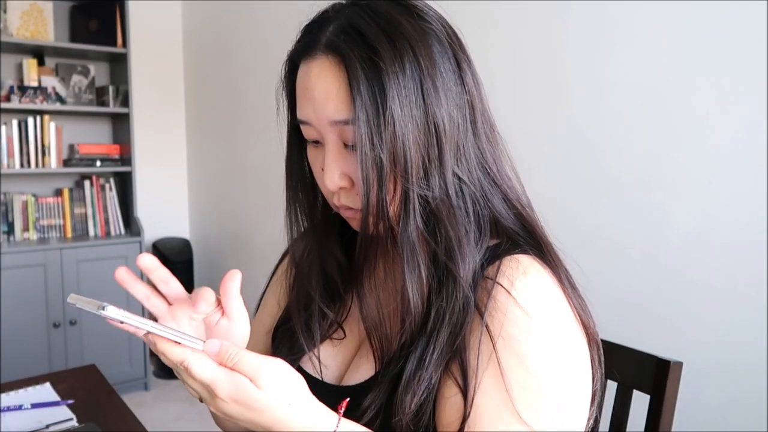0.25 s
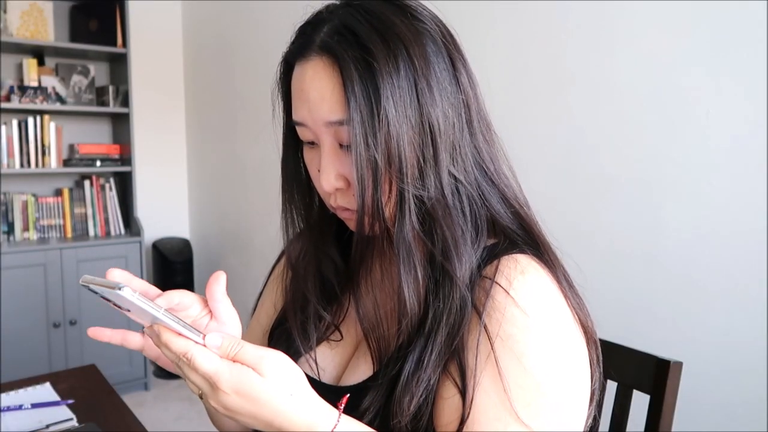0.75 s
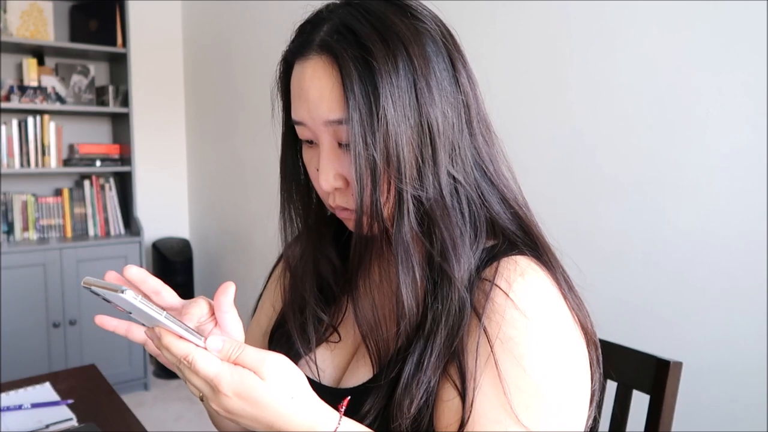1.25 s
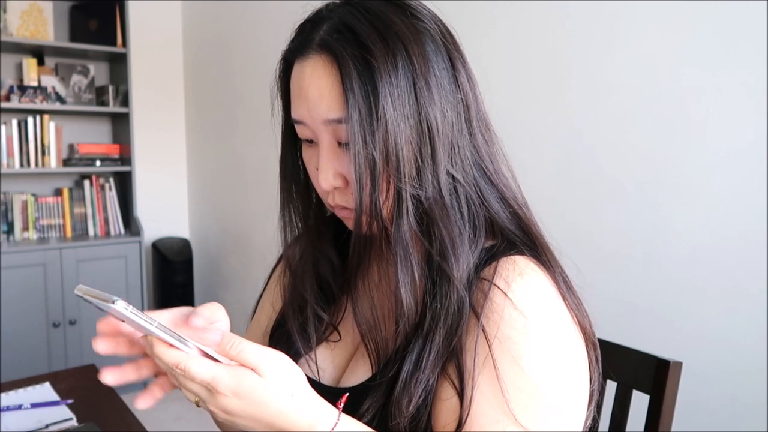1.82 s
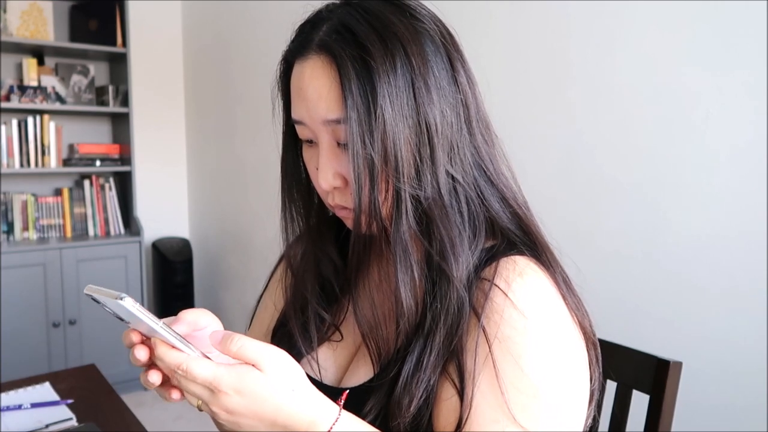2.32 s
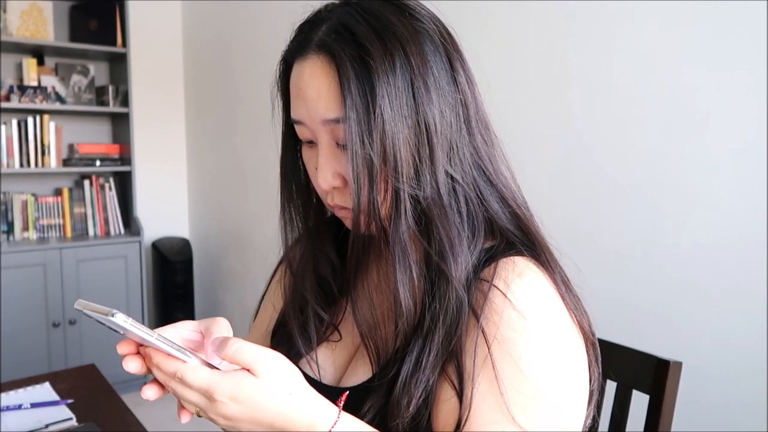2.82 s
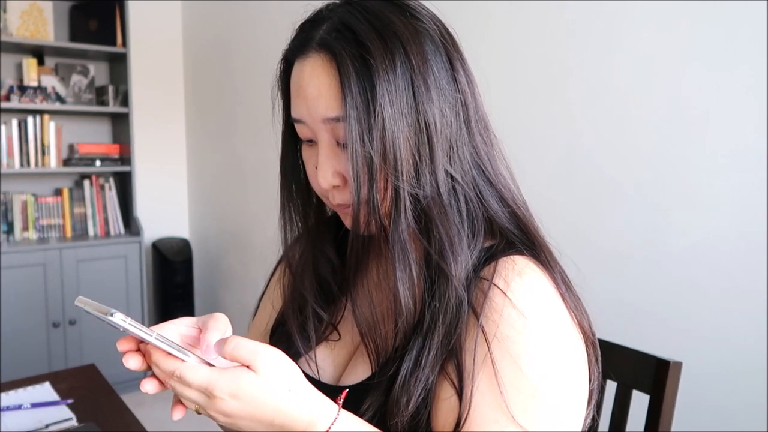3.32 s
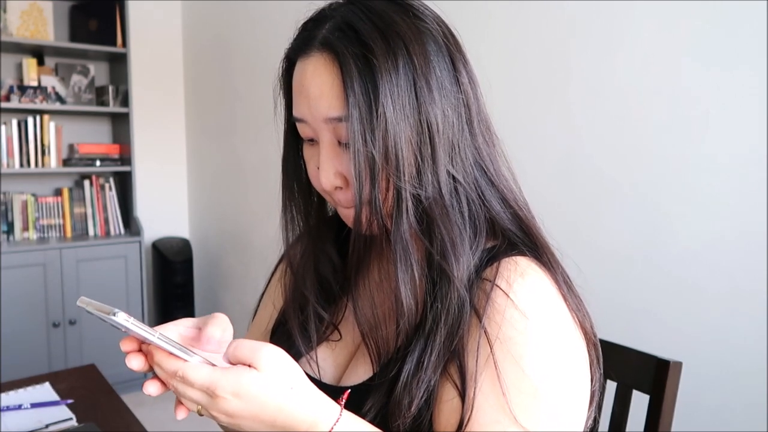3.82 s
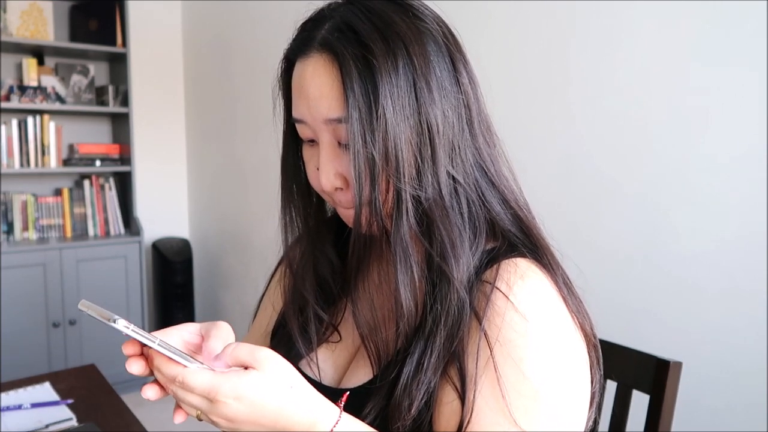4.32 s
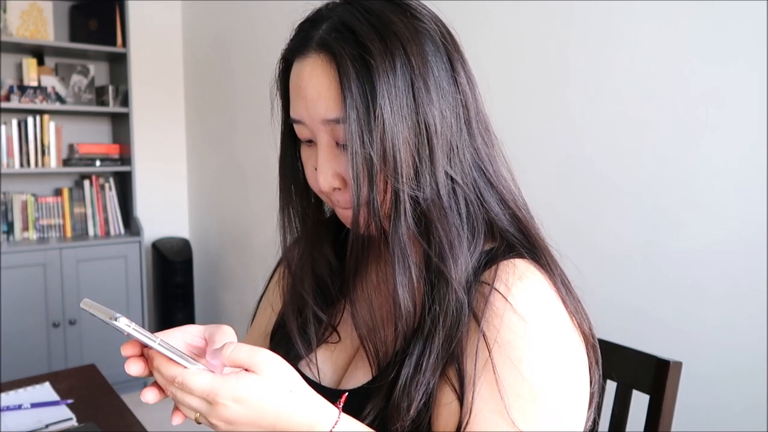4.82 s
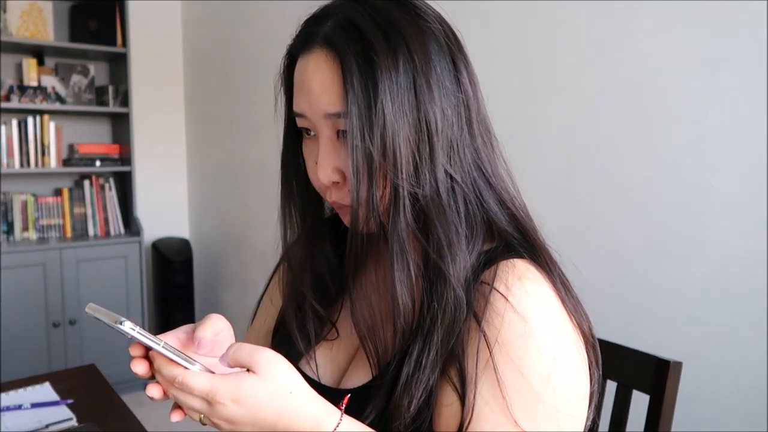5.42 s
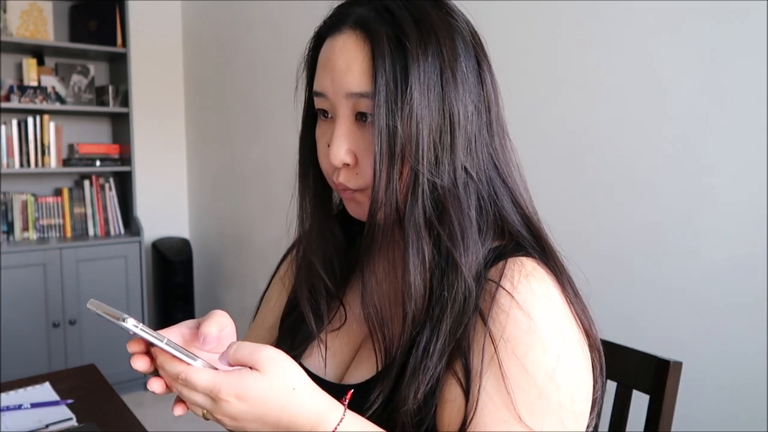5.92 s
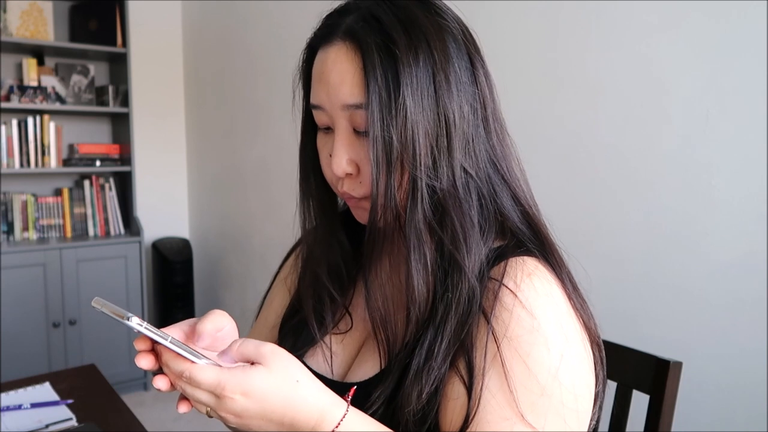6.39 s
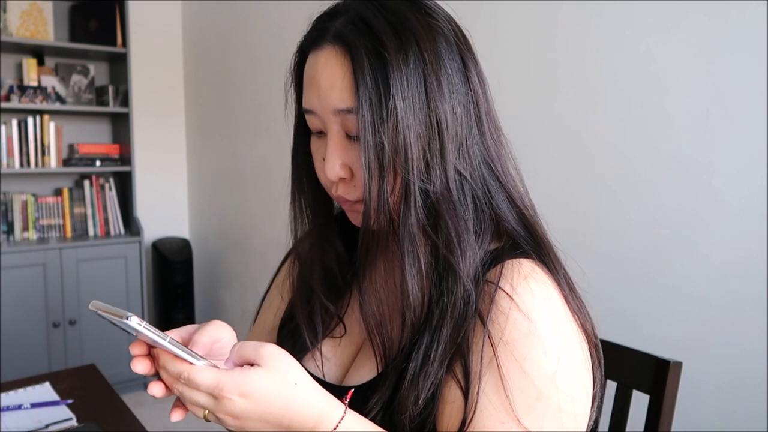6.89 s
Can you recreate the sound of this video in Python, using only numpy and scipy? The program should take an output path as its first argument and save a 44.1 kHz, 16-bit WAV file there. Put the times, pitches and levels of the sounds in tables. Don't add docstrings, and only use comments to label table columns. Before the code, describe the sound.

A quiet indoor room tone: dull mains hum, gentle hiss of moving air, thin wavering motor whine and minute lens-motor clicks.

```python
import sys
import numpy as np
from scipy import signal
from scipy.fft import rfft, irfft, next_fast_len
from scipy.io import wavfile
from scipy.ndimage import uniform_filter1d

SR = 44100
rng = np.random.default_rng(int(sys.argv[2]) if len(sys.argv) > 2 else 0)


def wav_record(signal):
    frames = np.transpose(np.atleast_2d(signal))
    bounded = np.clip(frames, -1, 1)
    quanta = np.round(bounded * 32767).astype(np.int16)
    wavfile.write(sys.argv[1], SR, quanta)


def nominal_scale(level):
    x = np.asarray(level, float) / 20
    return 10 ** x


N = 315315
T = np.arange(N) / SR
SIDES = np.array([[1], [-1]])
MAINS_HZ, SHAFT_HZ, FRAME_HZ, DRIVE_HZ = 60.004, 9.37, 29.97, 13006.99

# multiple of the mains, level in dB, left minus right in dB.
MAINS = [(2, -45.1, 0), (6, -69.5, 0.3), (8, -57.6, -1.8), (10, -68.2, 0)]
# frequency in Hz, level in dB, waver in Hz, right port lag in rad.
MOTOR_TONES = [(59.9, -64, .1, 0), (665.2, -72, .6, -.3), (3672.8, -89, .2, -.3), (4790, -92.5, 4, 0),
               (7416, -95, .5, 3), (10550, -100, .5, 3), (11778.2, -100, .1, -.8)]
# time in seconds, slot tone in Hz, its level in dB,
# level of the next shaft multiple in dB, beat lead in turns.
FAN_WHINE = [(0.0, 2426.1, -68, -70, .48), (.35, 2426.1, -67, -69, .44), (.68, 2426.6, -76, -69, .32),
             (1.05, 2428.3, -70, -68.5, .33), (1.35, 2427.7, -66.5, -67, .2),
             (1.75, 2427.5, -63.5, -69, .26), (2.1, 2426.7, -64, -67.5, .36), (2.5, 2425.8, -65, -69, .43),
             (2.9, 2425.3, -69, -71, .38), (3.2, 2424.5, -71, -71.5, .25), (3.5, 2424.4, -69.5, -75.5, .12),
             (3.9, 2424.2, -67, -73.5, .22), (4.4, 2423.0, -66.5, -75.5, .16),
             (4.9, 2425.2, -70.5, -74, .19), (5.4, 2424.9, -68.5, -70, .18), (5.9, 2427.2, -75, -69.5, .06),
             (6.4, 2427.4, -68, -71, -.05), (7.15, 2429.2, -66.5, -68.5, .06)]
GAITS = {"creep": (3, [(0, 0), (.014, -3), (.034, -3), (.058, -2.5)]), "hunt": (2, [(0, 0), (.026, -1.5)]),
         "turn": (2, [(0, 0), (.017, -1.5)]), "sweep": (3, [(0, 0), (.017, -2), (.067, -.5)]),
         "nudge": (1, [(0, 0)])}
# start in seconds, gait, number of cycles, level in dB.
FOCUS_MOVES = [(.018, "creep", 2, -57), (.218, "nudge", 1, -58), (.318, "hunt", 1, -57),
               (.688, "nudge", 2, -53), (.753, "hunt", 1, -60), (.821, "turn", 1, -56),
               (.886, "hunt", 2, -58), (1.013, "nudge", 1, -59), (1.059, "turn", 1, -56),
               (1.119, "hunt", 1, -55), (1.186, "creep", 4, -56), (1.592, "turn", 1, -57),
               (1.677, "nudge", 1, -57), (1.72, "creep", 7, -56), (2.424, "turn", 1, -60),
               (2.512, "nudge", 1, -58), (2.554, "creep", 22, -56), (4.765, "creep", 1, -54),
               (4.889, "creep", 2, -56), (5.082, "nudge", 1, -59), (5.131, "hunt", 5, -58),
               (5.467, "turn", 2, -56), (5.598, "nudge", 1, -59), (5.632, "turn", 1, -55),
               (5.699, "sweep", 3, -54), (5.999, "nudge", 2, -59), (6.106, "nudge", 1, -54),
               (6.138, "hunt", 1, -53)]
BARREL_HZ = [3700, 3830, 4095, 4180, 4310, 4420, 4620, 5000, 5400, 5650, 6800]
# t60 in seconds, level in dB, share opposite at the two ports (0-1).
BARREL_MODES = [(0.018, -6.5, 0), (0.016, -5, 1), (0.029, -1.5, 0.99), (0.046, -8.5, 0.06),
                (0.022, -13, 0.6), (0.025, -11, 0), (0.028, -9, 0), (.01, -3, 1), (0.012, -7, 0),
                (.01, -5, 1), (.004, -14, .5)]
# frequency in Hz, width in Hz, level in dB, drift in Hz.
VENT_WHISTLES = [(770, 8, -77, 8), (822, 8, -75, 6), (1195, 8, -79, 8), (1230.5, 6, -72, 3),
                 (1350, 10, -78, 12), (1516, 5, -79, 3), (1658, 6, -78, 4), (1692, 16, -73, 7),
                 (1752, 8, -80, 6), (2250, 18, -80, 10), (2610, 12, -82, 10)]
# frequency in Hz, density in dB per Hz.
AIR_RUSH = [(22, -94), (36, -84), (50, -77.5), (66, -78.5), (78, -73.5), (100, -66.5), (135, -69),
            (175, -66.5), (212, -71), (235, -77.5), (320, -77.5), (345, -79), (375, -77), (405, -85),
            (450, -76), (488, -82.5), (570, -85.5), (800, -85.5), (900, -89.5), (1300, -88.5),
               (1650, -90.5), (1900, -94.5), (2400, -94.5), (3000, -99.7), (4200, -102.2), (6000, -106.5),
               (9000, -113.1), (12500, -119.0)]
# frequency in Hz, density in dB per Hz.
PORT_NOISE = [(25, -108), (60, -102), (120, -86), (200, -82), (300, -82.5), (460, -83.5), (520, -88),
              (900, -91.5), (1600, -95), (2600, -99.5), (4200, -102.5), (6000, -108), (9000, -114),
              (12500, -119)]
# frequency in Hz, density in dB per Hz.
NOISE_TOP = [(13050, -120), (13200, -127), (13350, -136), (13700, -150)]
# frequency in Hz, width in Hz, dB over the rush.
DUCT_MODES = [(53.7, 3, 11.5), (88.5, 1.7, 2.5), (205, 4.9, 2.5), (331, 6, 6.5), (421.3, 2.9, 8.5),
              (524, 25, 4), (362, 2.9, 3), (716, 12, 1), (948, 8.4, 5.5), (1020, 10, 2), (1049, 20, 2.5),
              (645, 14, -3), (1130, 40, -3), (1290, 40, -1.5), (3740, 60, 1.5), (1620, 40, -1.5),
              (1690, 40, 2), (2440, 250, 2.8), (2900, 200, 1.5), (3450, 200, 1), (5400, 350, 1.5)]
# time in seconds, frequency in Hz.
FLECKS_ALIKE = [(.64, 13400), (.66, 13700), (1.36, 13500), (1.41, 13700), (1.66, 13600), (1.71, 13400),
                (2.27, 13450), (2.31, 13400), (2.45, 13450), (2.59, 13500), (2.59, 14500), (2.59, 15000),
                (2.8, 13400), (3.13, 13450), (3.47, 13700), (3.54, 13450), (3.85, 13700), (4.01, 13400),
                (4.08, 13400), (4.17, 13650), (4.54, 14500), (4.54, 15100), (4.84, 13450), (5.08, 14500),
                (5.1, 13450), (5.47, 13800), (5.47, 14200), (5.94, 13400), (5.94, 13750), (6.96, 13400)]
# time in seconds, frequency in Hz.
FLECKS_OPPOSITE = [(.06, 14240), (.48, 13425), (.6, 13490), (.66, 14240), (.71, 13500), (.71, 13750),
                   (1.13, 14230), (1.66, 14220), (1.78, 14240), (1.94, 14090), (1.94, 13450), (2.34, 14240),
                   (2.43, 14030), (2.61, 13810), (2.61, 14350), (2.71, 14240), (2.8, 13490), (3.2, 13950),
                   (3.24, 14265), (3.24, 13730), (3.43, 13470), (3.47, 14220), (3.85, 13640), (3.85, 14010),
                   (4.17, 14220), (4.5, 14265), (4.5, 13600), (4.77, 13640), (4.77, 14240), (5.47, 14240),
                   (5.68, 13640), (5.94, 14210), (6.52, 14240), (6.89, 14230)]


def walk(rate_hz):
    hold = int(SR / rate_hz)
    levels = np.repeat(rng.standard_normal(N // hold + 1), hold)
    return 1.3 * uniform_filter1d(uniform_filter1d(levels, hold), hold)[:N]


def tone(hz, db, pan_db=0., lag_rad=0.):
    phase = 2 * np.pi * np.cumsum(hz + 0 * T) / SR
    return np.sqrt(2) * nominal_scale(db + SIDES * pan_db / 2) * np.exp(1j * (phase + SIDES * lag_rad / 2))


def hum():
    out = tone(FRAME_HZ, -78)
    for multiple, db, pan_db in MAINS:
        start = np.exp(2j * np.pi * rng.random())
        out = out + start * tone(multiple * MAINS_HZ, db + .4 * walk(2), pan_db)
    for hz, db, waver_hz, lag_rad in MOTOR_TONES:
        out = out + tone(hz + waver_hz * walk(2.076), db + 1.3 * walk(1.8), lag_rad=lag_rad)
    return out.real


def fan_motor():
    s, *columns = np.transpose(FAN_WHINE)
    hz, db, above_db, lead_turns = (np.interp(T, s, c) for c in columns)
    turn = np.exp(2j * np.pi * (SHAFT_HZ * T + lead_turns - .04))
    neighbours = 1 + nominal_scale(above_db - db) * turn
    neighbours += nominal_scale(-16) * np.exp(2j * walk(2)) * turn ** 2
    neighbours += nominal_scale(-15) * np.exp(2j * walk(2)) / turn
    neighbours += nominal_scale(-12 + 3 * walk(1.5)) * turn ** 9
    neighbours += nominal_scale(-14 + 3 * walk(1.5)) / turn ** 9
    slot = tone(hz + 0.4 * walk(26.1), db + 0.5 * walk(16) + 0.2, pan_db=3.5, lag_rad=0.3)
    return (slot * neighbours).real


def step_times():
    steps = []
    for start_s, gait, cycles, move_db in FOCUS_MOVES:
        frames, pattern = GAITS[gait]
        for cycle in range(cycles):
            cycle_s = start_s + cycle * frames / FRAME_HZ
            steps += [(cycle_s + late_s, move_db + step_db) for late_s, step_db in pattern]
    s, db = np.transpose(steps)
    scatter_db = -1
    return s, db + scatter_db * rng.standard_normal(len(s))


def focus_motor():
    s, db = step_times()
    scrape_s, slide_s = 0.00092, .014
    knocks = np.zeros(N)
    knocks[(s * SR).astype(int)] = nominal_scale(db - 15.5)
    scrape = signal.lfilter([1], [1, -np.exp(-1 / (scrape_s * SR))], knocks)
    scrape += nominal_scale(-17) * signal.lfilter([1], [1, -np.exp(-1 / (slide_s * SR))], knocks)
    out = np.zeros((2, N))
    for hz, (t60_s, mode_db, opposite) in zip(BARREL_HZ, BARREL_MODES):
        pole = np.exp(2j * np.pi * hz / SR - np.log(1000) / (t60_s * SR))
        ring = signal.lfilter([nominal_scale(mode_db)], [1, -pole], scrape * rng.standard_normal(N)).imag
        out += ring * (np.sqrt(1 - opposite) + SIDES * np.sqrt(opposite))
    return out


def drive_tone():
    throb = 1.15 - .9 * np.cos(2 * np.pi * FRAME_HZ * T)
    return (tone(DRIVE_HZ, -80, pan_db=.5, lag_rad=1.93) * throb).real


def whistles():
    swell_db = 2.5
    out = np.zeros((2, N))
    for hz, width_hz, db, drift_hz in VENT_WHISTLES:
        breath = (walk(width_hz) + 1j * walk(width_hz)) / np.sqrt(2)
        edge = tone(hz + drift_hz * walk(1.2), db - 2 + swell_db * walk(2.5), lag_rad=.3)
        out += (edge * breath).real
    return out


def coloured(spectrum, resonances, flicker_db):
    ripple_db, ripple_hz = .9, 14
    size = next_fast_len(N)
    hz = np.arange(1, size // 2 + 2) * SR / size
    point_hz, point_db = np.transpose(spectrum)
    db = np.interp(np.log(hz), np.log(point_hz), point_db)
    lift = 1 + sum((nominal_scale(g) ** 2 - 1) / (1 + (2 * (hz - f) / w) ** 2) for f, w, g in resonances)
    bins = int(ripple_hz * size / SR)
    ripple = np.sqrt(bins) * uniform_filter1d(rng.standard_normal(len(hz)), bins)
    db += ripple_db * ripple * (hz > 550) * (hz < 3000)
    shaped = rfft(rng.standard_normal(size)) * nominal_scale(db) * np.sqrt(lift * SR / 2)
    octave = np.log2(hz / 20)
    out = np.zeros(N)
    for k in range(11):
        band = np.cos(np.pi / 2 * np.clip(octave - k, -1, 1)) ** 2
        depth_db = flicker_db * np.clip((9.5 - k) / 4, .2, 1)
        out += nominal_scale(depth_db * walk(2.9)) * irfft(shaped * band, size)[:N]
    return out


def air():
    flow_rate_hz, flow_db = 4.04, 0.8
    common = coloured(AIR_RUSH + NOISE_TOP, DUCT_MODES, 0.96)
    apart = coloured(PORT_NOISE + NOISE_TOP, [], .4)
    bass = signal.sosfiltfilt(signal.butter(4, 240, fs=SR, output="sos"), common)
    swell = nominal_scale(flow_db * walk(flow_rate_hz)) - 1
    return common + swell * bass + SIDES * apart


def flecks(rows):
    block, offset, level_db = 1024, 641, -92
    out, k = np.zeros(N), np.arange(2 * block)
    fade = np.sin(np.pi * k / (2 * block))
    for s, hz in rows:
        start = offset + block * (round((s * SR - offset) / block) - 1)
        out[start + k] += nominal_scale(level_db) * fade * np.cos(2 * np.pi * hz * k / SR)
    return out


def scene():
    return hum() + fan_motor() + focus_motor() + drive_tone() + whistles() + air()


def band_limit(x):
    return signal.sosfilt(signal.butter(12, 15500, fs=SR, output="sos"), x)


def record(dry):
    edge = signal.ellip(10, .2, 50, 13180, fs=SR, output="sos")
    mix = signal.sosfilt(edge, dry) + .0003
    mix = mix + flecks(FLECKS_ALIKE) + SIDES * flecks(FLECKS_OPPOSITE)
    return band_limit(mix)


dry = scene()
out = record(dry)
wav_record(out)
```